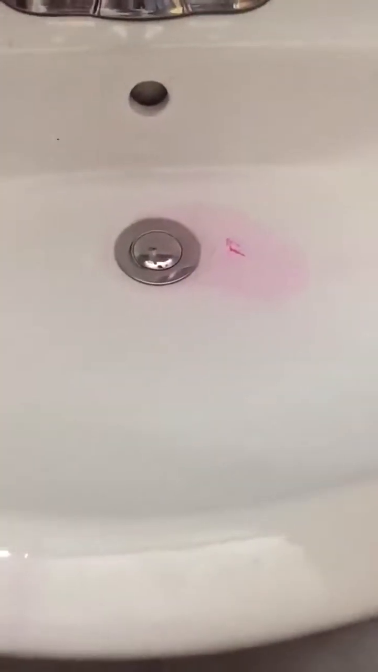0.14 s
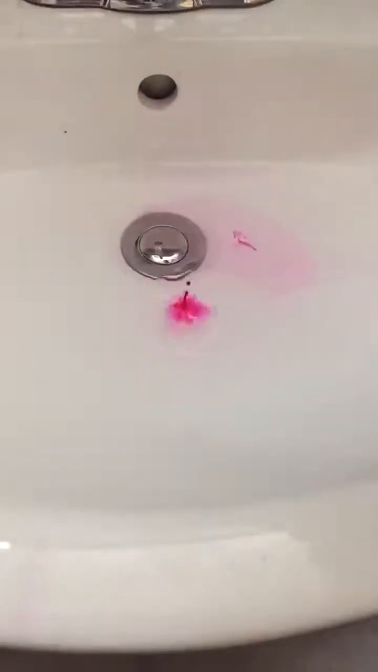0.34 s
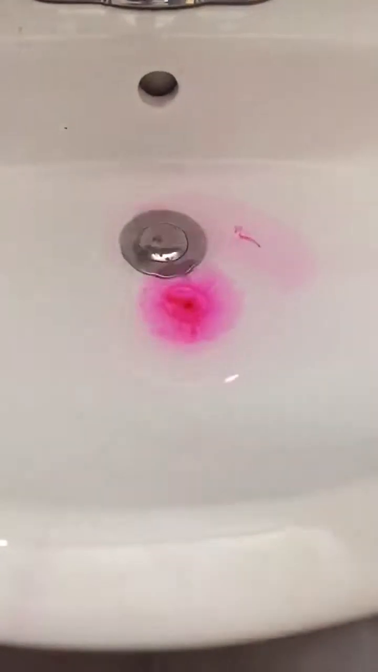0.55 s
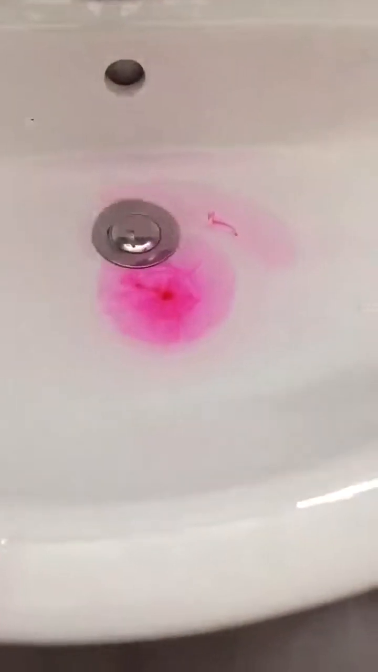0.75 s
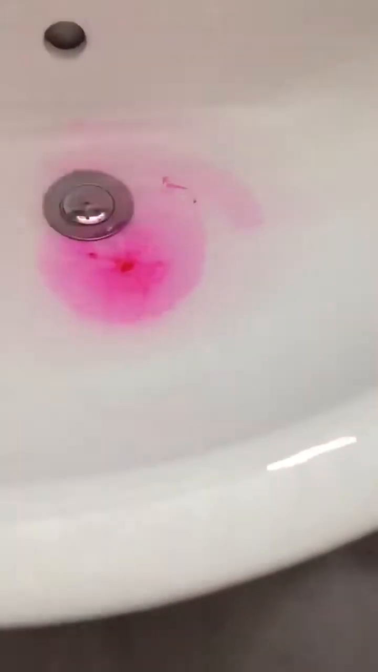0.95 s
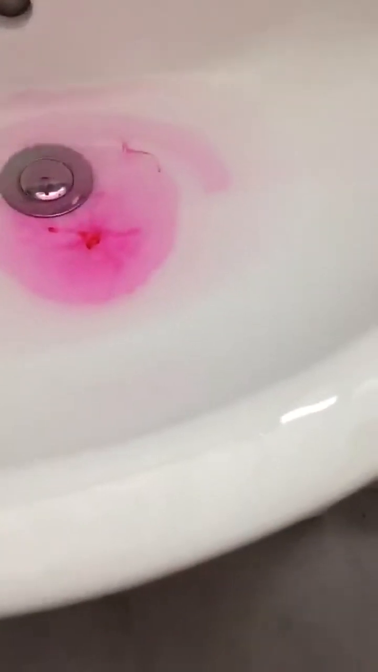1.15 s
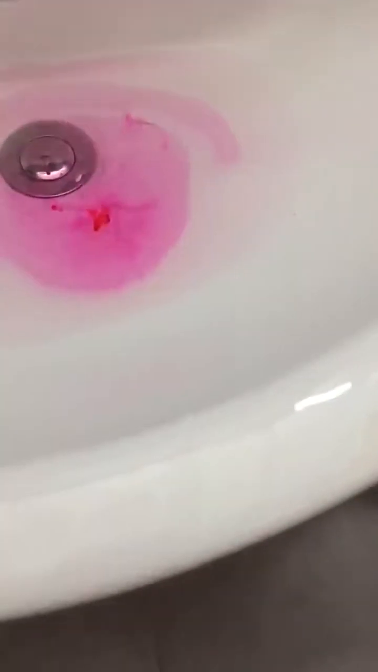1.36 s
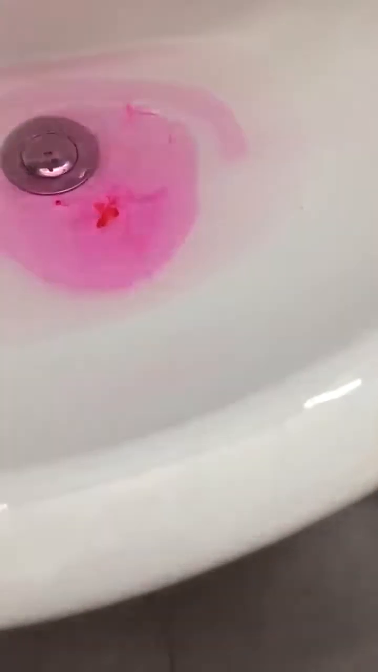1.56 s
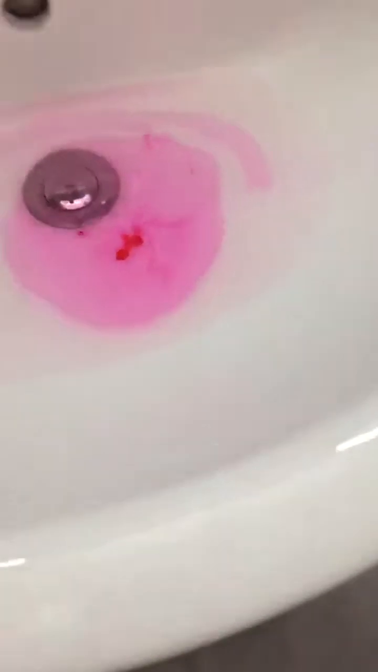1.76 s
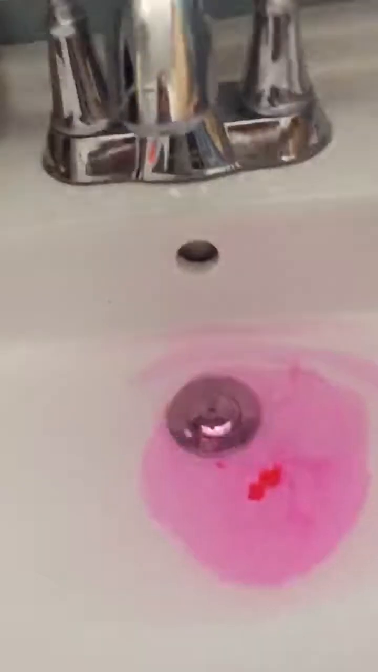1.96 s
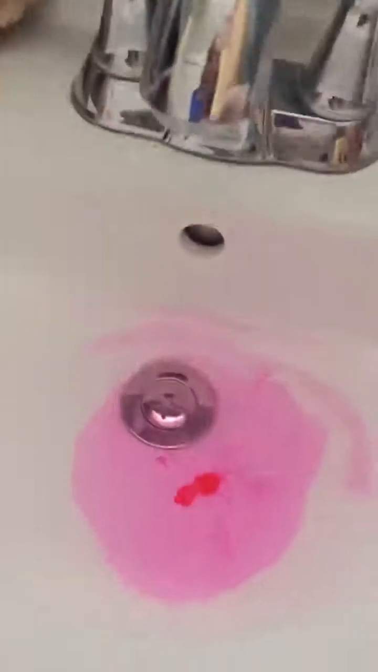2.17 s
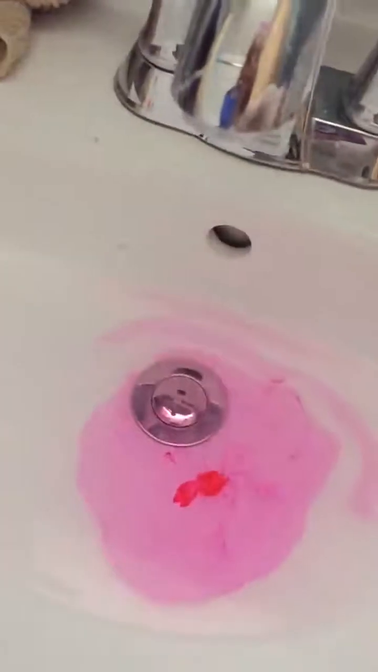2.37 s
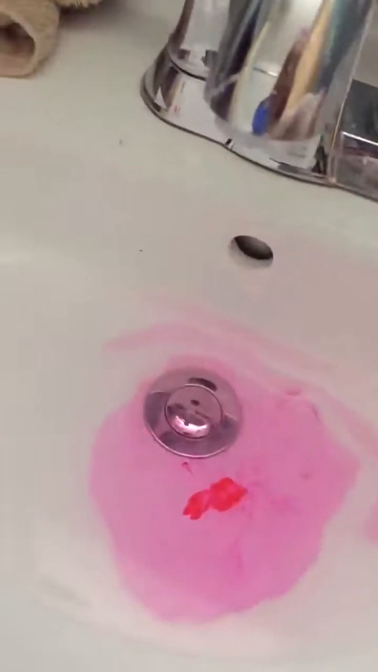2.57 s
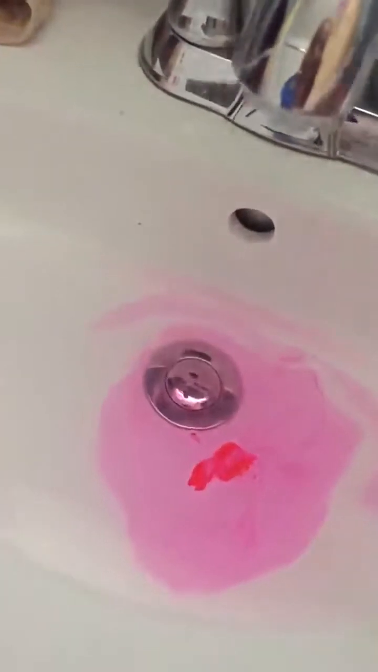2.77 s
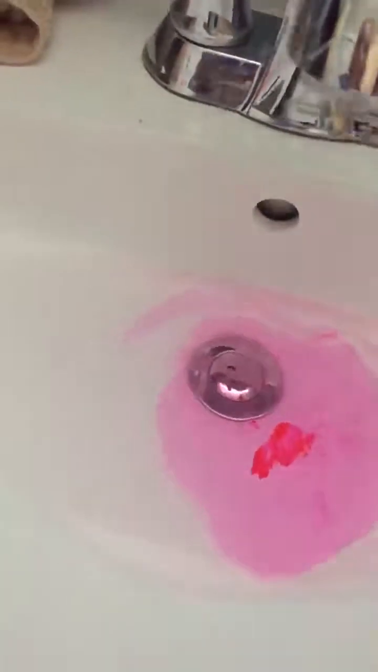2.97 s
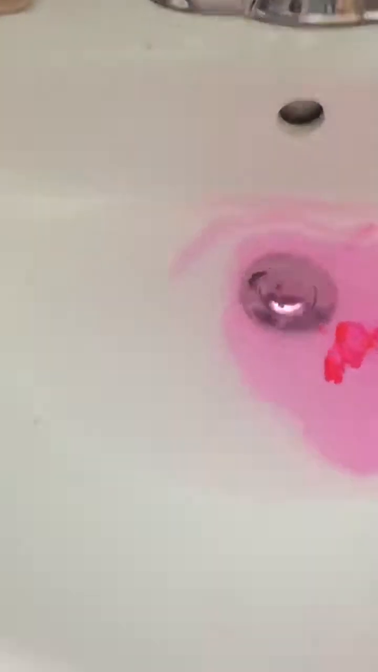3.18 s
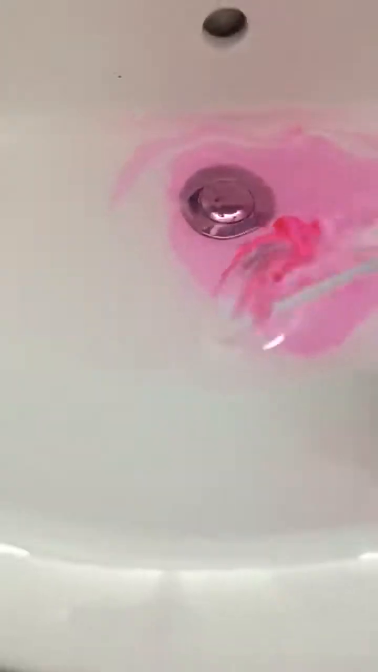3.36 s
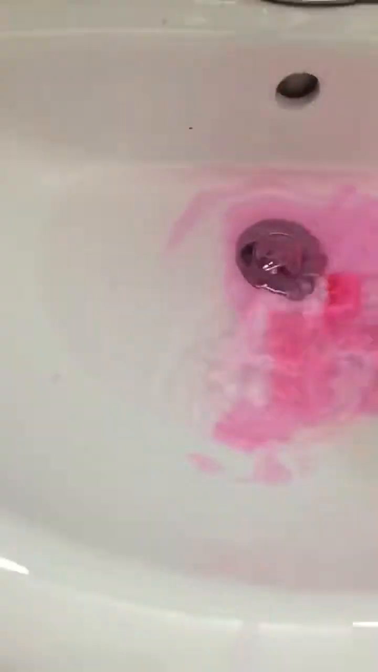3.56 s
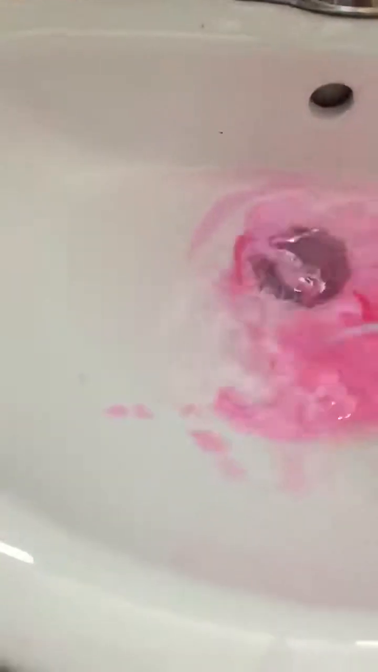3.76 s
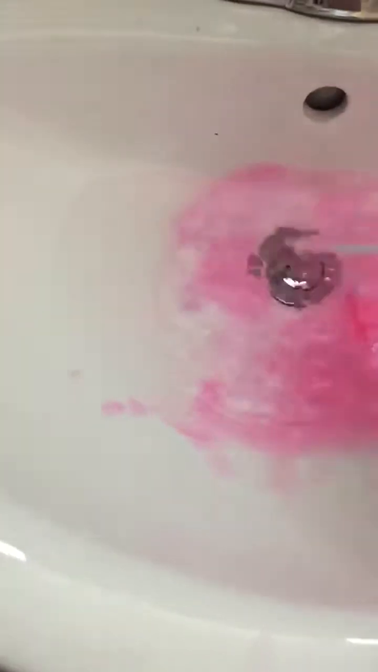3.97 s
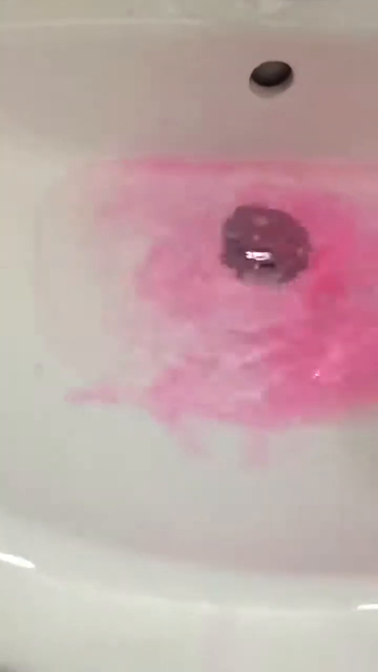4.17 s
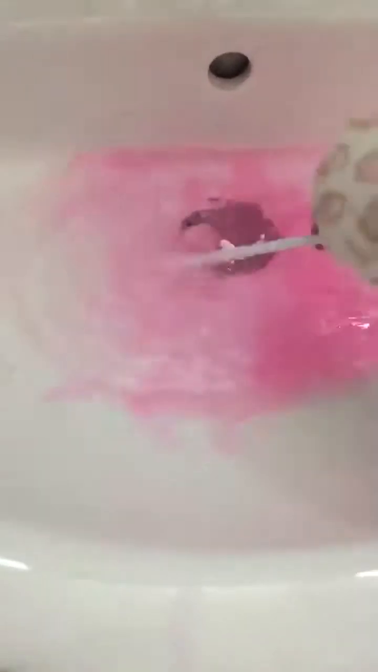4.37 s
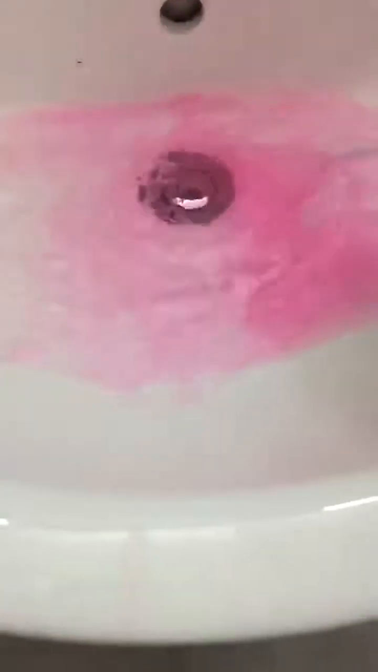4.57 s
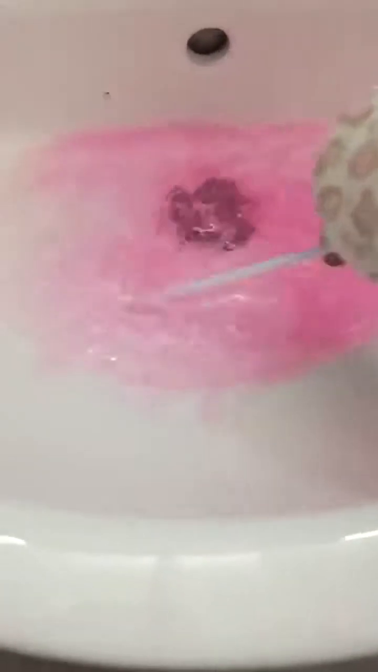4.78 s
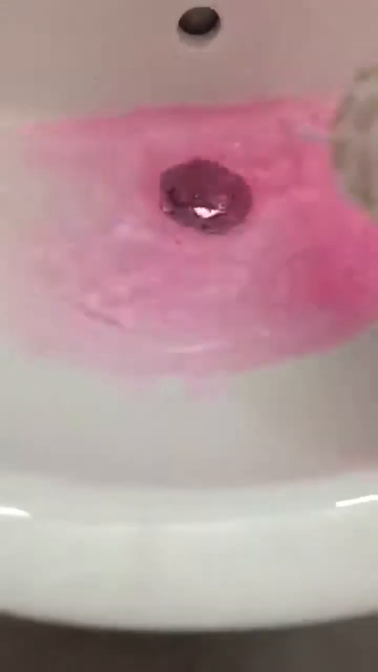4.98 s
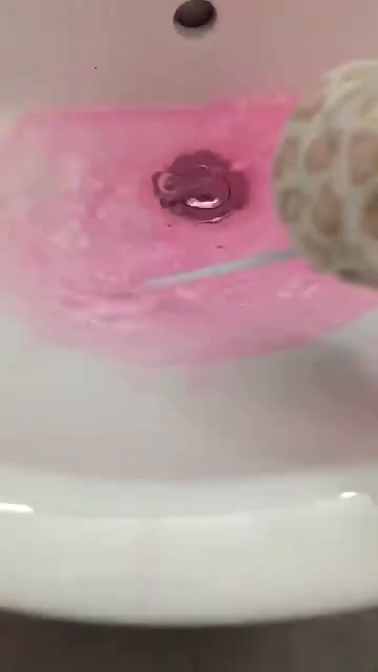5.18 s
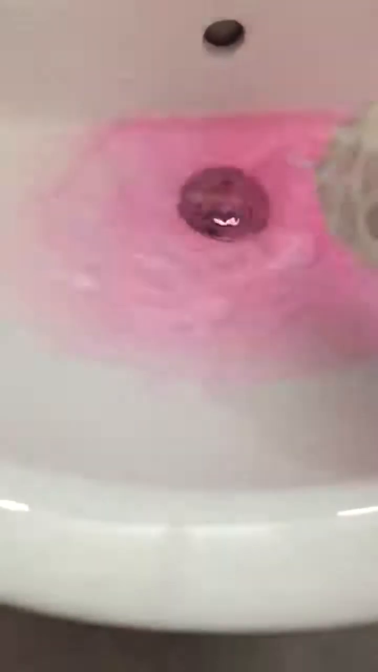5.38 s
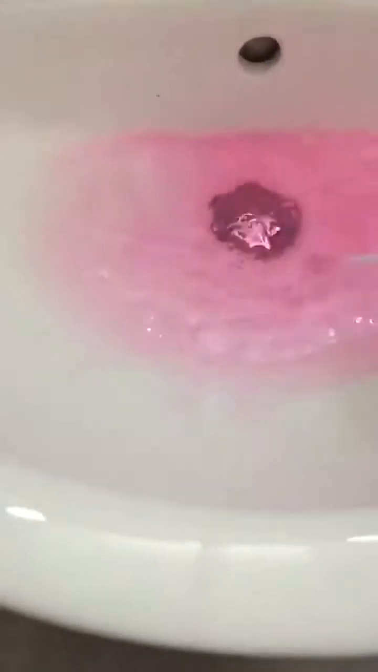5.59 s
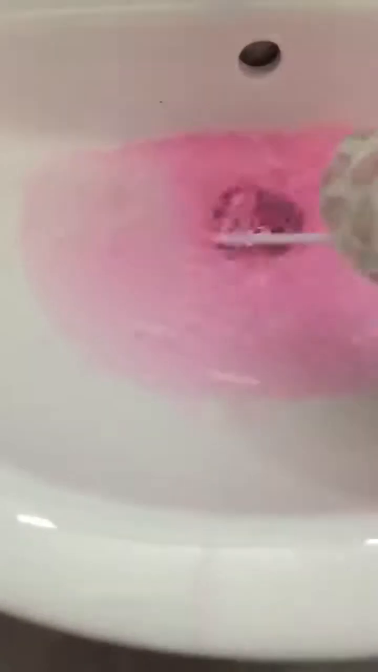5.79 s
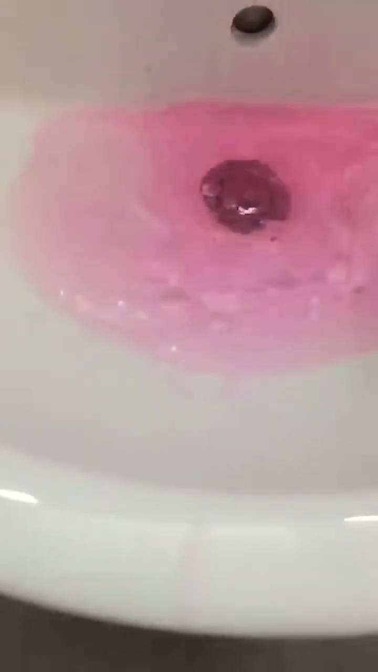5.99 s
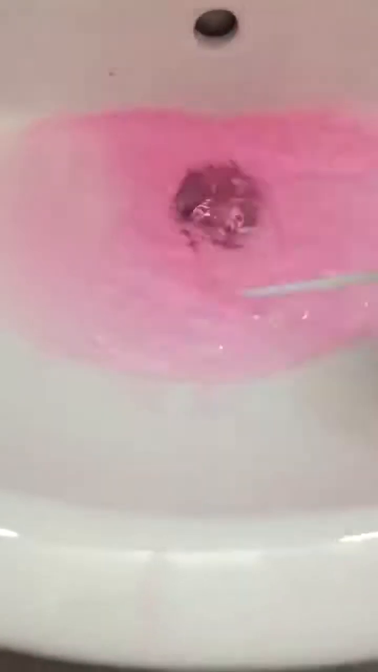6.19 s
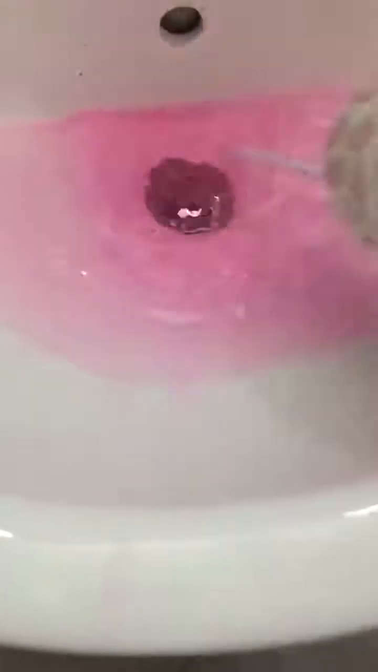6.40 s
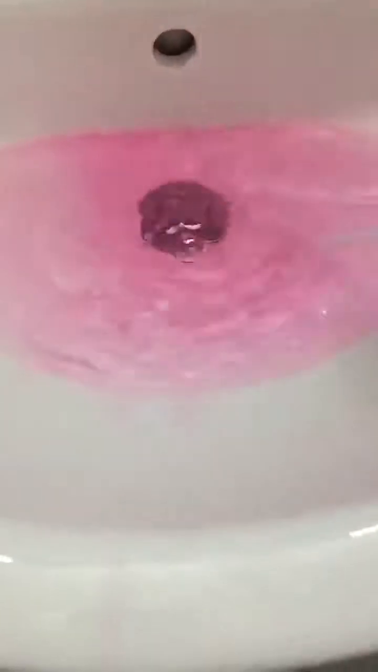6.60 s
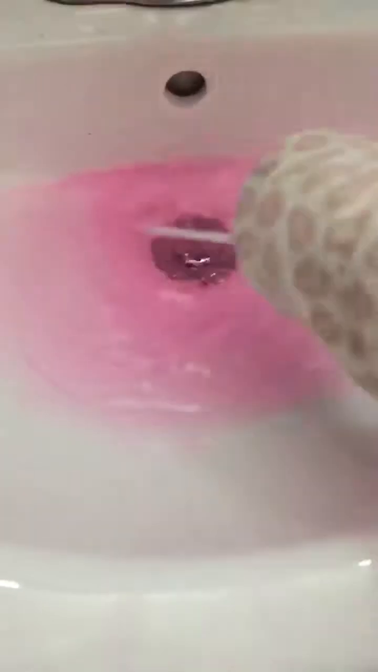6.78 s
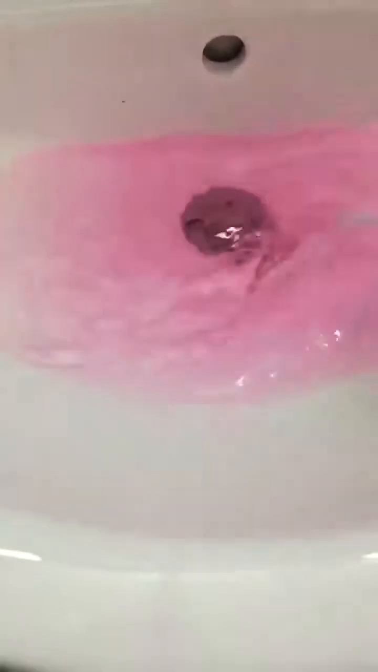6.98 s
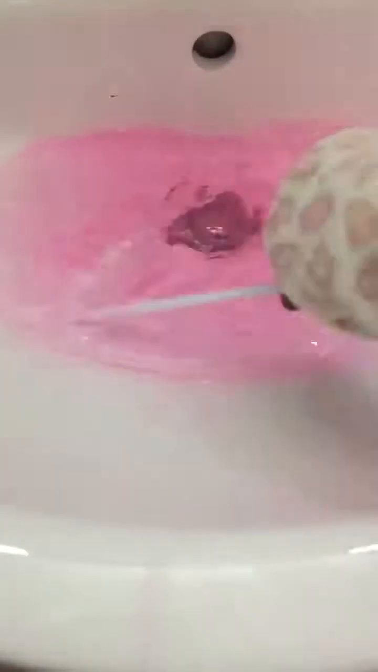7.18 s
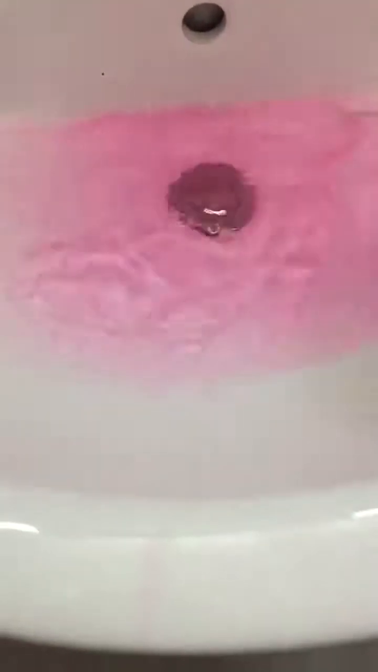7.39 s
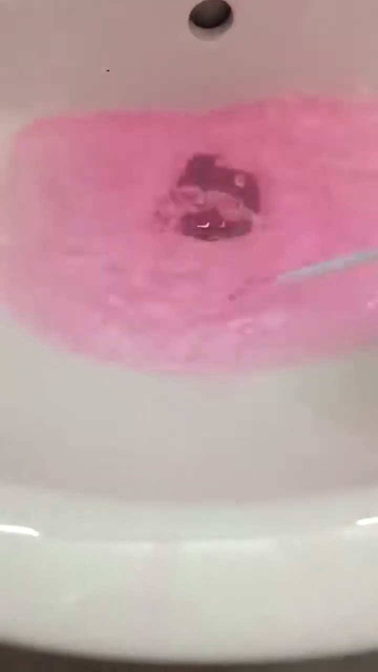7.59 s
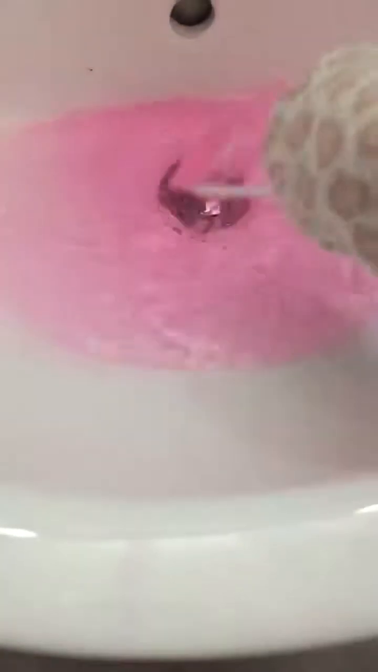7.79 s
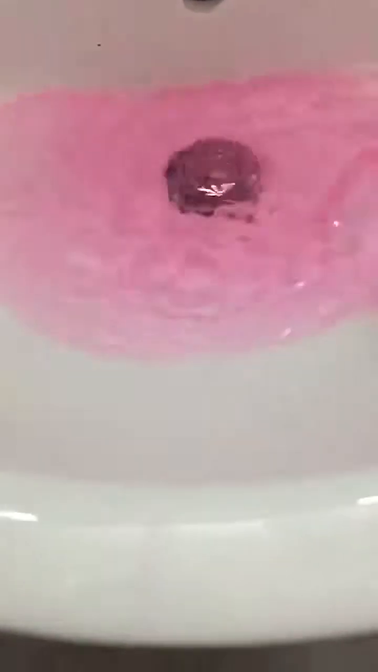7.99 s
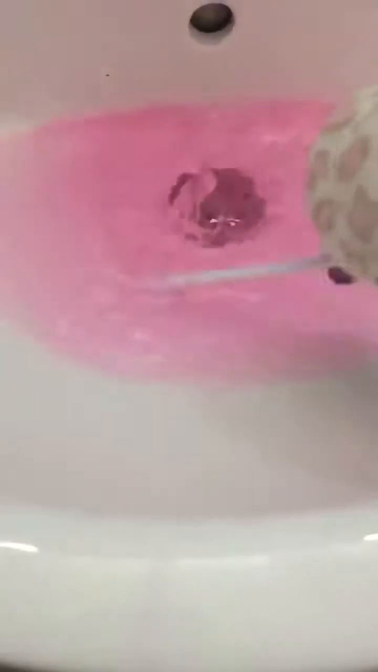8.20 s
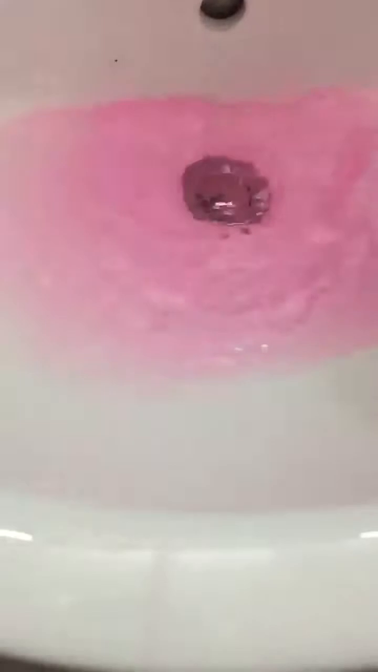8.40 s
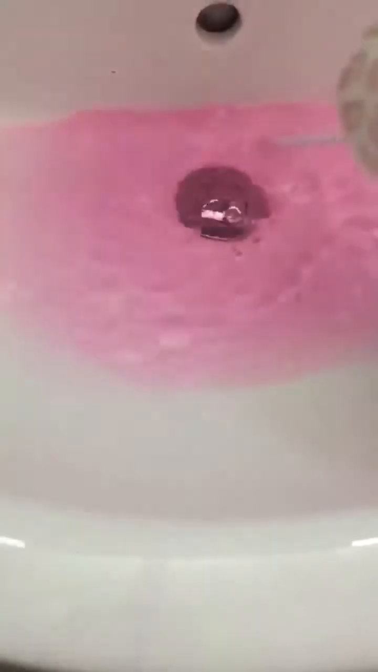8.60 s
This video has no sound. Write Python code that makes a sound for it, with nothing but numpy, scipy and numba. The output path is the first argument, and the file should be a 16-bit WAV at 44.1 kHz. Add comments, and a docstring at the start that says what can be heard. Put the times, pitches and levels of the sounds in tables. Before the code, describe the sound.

A small, quiet bathroom heard close to a ceramic sink. Low room tone and a very faint hum run throughout. At 0.4 s a tiny drip chirps upward, with soft creaks underfoot until about 0.7 s. At 1.4 s something clicks lightly with a hollow knock; faint dull bumps follow around 2.2 s. A small tap at 2.9 s and more creaks lead to 3.3 s, when a thin stick begins stirring shallow water. From 3.7 s the strokes become fuller, quick and irregular, several each second: wet sloshes, gliding bubble pops, glassy plinks, droplet ticks and patchy spray, with brief lulls between. Sharp taps make the basin ring for under a tenth of a second. Strong splashes come near 4.45, 6.2 and 7.6 s, with a loud plop and tap at 8.3 s. At 8.5 s the water stops abruptly; only muffled room tone, a soft creak and a dull bump remain.

```python
"""A small quiet bathroom: room tone with a faint hum; a drop falls (one chirp gliding up), the floor creaks
(noise slips through board modes), something clicks on the rim (noise cracks) and dull knocks follow.
Then a thin stick stirs shallow water in a ceramic sink: bubbles ring as gliding sines, taps ring the
basin's modes, droplets patter in noise and chirps. At the end the water stops and the rest sounds muffled."""
import sys
import numpy as np
from scipy import signal
from scipy.fft import rfft, irfft
from scipy.io import wavfile
from scipy.ndimage import uniform_filter1d
from numba import njit

SR = 44100
rng = np.random.default_rng(int(sys.argv[2]) if len(sys.argv) > 2 else 0)


def voltage_ratio(level):
    """Linear amplitude factor for a level in decibels (scalar or array-like)."""
    return 10 ** (np.asarray(level, float) / 20)


def file_out(sig):
    """Save sig as 16-bit WAV at sys.argv[1]."""
    # one column per channel
    cols = np.atleast_2d(sig).T
    # limit, then scale
    lim = np.clip(cols, -1, 1)
    pcm = np.round(lim * 32767).astype(np.int16)
    wavfile.write(sys.argv[1], SR, pcm)


N = 381465
T = np.arange(N) / SR

# modes of the ceramic basin: pitch_hz, relative_level_db, t60_s
BASIN = [(1360, -0.5, 0.072), (1620, -3.5, 0.055), (2100, 0, 0.047), (2364, -3.5, 0.097), (3300, -9, 0.088),
         (4450, -6, 0.1), (4560, -6.5, 0.064), (3840, -11.5, 0.09), (5100, -17, 0.072), (6460, -11, 0.063),
         (5950, -0.5, 0.027), (7340, -5, 0.034), (8920, 1.5, 0.025)]
STIR_START_S, STIR_END_S, MUFFLED_S = 3.335, 8.5, 8.512
LULL_SLOSH_DB, LULL_SPRAY_DB = -65.5, -61  # the water between strokes


def unit(x):
    """Scale to rms 1."""
    return x / np.sqrt(np.mean(x ** 2))


def coloured(x, points):
    """Shape a signal by (Hz, dB) points."""
    hz, db = np.transpose(points)
    f = np.arange(1, len(x) // 2 + 2) * SR / len(x)
    gain = voltage_ratio(np.interp(np.log(f), np.log(hz), db))
    return irfft(rfft(x) * gain, len(x))


def resonance(x, hz, width_hz):
    """Two-pole band-pass, gain 1 at the centre."""
    return signal.lfilter(*signal.iirpeak(min(hz, .45 * SR), hz / width_hz, SR), x)


def decay(t, t60_s):
    """Exponential envelope that falls 60 dB in t60_s."""
    return np.exp(-np.log(1000) * t / t60_s)


def add(out, start_s, x):
    """Mix x in at start_s."""
    i = int(start_s * SR)
    out[i:i + len(x)] += x[:N - i]


@njit
def chirps(rows, n, rise_s, fall_s):
    """Sines that glide in pitch and level for their length, then die quickly."""
    out = np.zeros(n)
    for start_s, length_ms, db0, db1, hz0, hz1 in rows:
        start, length, phase = int(start_s * SR), length_ms * SR / 1000, 0.
        for i in range(min(int(length + 5 * fall_s * SR), n - start)):
            u = i / length
            hz = min(hz0 * (hz1 / hz0) ** min(u, 1.5), .45 * SR)
            phase += 2 * np.pi * hz / SR
            gain = 10 ** ((db0 + (db1 - db0) * min(u, 1.)) / 20)
            gain *= 1 - np.exp(-i / (rise_s * SR))
            gain *= np.exp(-max(i - length, 0.) / (fall_s * SR))
            out[start + i] += gain * np.sin(phase)
    return out


def air():
    """Room tone as coloured noise, and a faint mains hum."""
    # spectrum of the room tone: freq_hz, relative_level_db_per_hz
    tone_points = [(25, -28), (58, -6), (349, -14), (445, -14), (496, -8), (538, -19.5), (746, -17.5),
                   (1360, -21), (15200, -34.5), (16500, -51.5)]
    tone = voltage_ratio(-67.5) * unit(coloured(rng.standard_normal(N), tone_points))
    hum = voltage_ratio(-75) * np.sin(2 * np.pi * 119.8 * T)
    return tone + hum


def bubbles():
    """Air pockets dragged under by the stick, mostly rising in pitch as each nears the surface; droplet ticks."""
    # the first drop, a tiny bubble that bursts at once:
    # start_s, length_ms, start_db, end_db, start_hz, end_hz (levels before wobble)
    drop_row = (.411, 9, -50, -46, 4200, 13000)
    # bubbles and one droplet tick: start_s, length_ms, start_db (before wobble), start_hz, end_hz
    bubble_rows = [(3.429, 8.1, -21, 1510, 2330), (3.535, 20.6, -40.5, 655, 795),
                   (3.56, 24.5, -46, 815, 1050), (3.687, 23, -51, 724, 970.0),
                   (3.708, 6.4, -26, 717.0, 885.0), (3.711, 11.3, -12, 1037, 1265),
                   (3.728, 7.6, -19.5, 900.0, 1330), (3.846, 16, -42.5, 627, 694),
                   (3.872, 17.4, -26.5, 624, 702), (3.871, 28, -32.5, 1410, 1916),
                   (3.908, 10, -32.5, 1170, 1730), (3.915, 6.7, -16.5, 1830, 2580),
                   (3.972, 6.6, -31, 1250, 1326), (4.0143, 1.5, -19, 6100, 6300),
                   (4.136, 2.9, -13, 1100, 1020), (4.143, 4.5, -18.5, 2480.0, 2700.0),
                   (4.269, 29, -37, 1680, 1970), (4.369, 21, -39.5, 610, 710), (4.4, 10, -19, 1030, 1330.0),
                   (4.4, 22, -25.5, 606, 1150), (4.414, 10, -31, 1290, 1710), (4.431, 18, -23.5, 700, 810),
                   (4.464, 4.1, -15, 910, 930), (4.453, 15, -22.5, 767.0, 620),
                   (4.476, 18.6, -19.5, 548, 524), (4.504, 17, -23.5, 745, 634),
                   (4.503, 5, -22, 1050, 1295), (4.582, 29, -46, 847, 2290), (4.733, 25, -43.5, 685, 1100),
                   (4.76, 4.4, -20, 836, 884), (4.761, 3.5, -10.5, 1140, 1165),
                   (4.787, 5.7, -22.5, 890.0, 875), (4.818, 2.3, -19.5, 2060, 2120),
                   (4.819, 11, -25.5, 1580, 1654), (4.926, 4.6, -26, 2200, 2300),
                   (4.969, 6.9, -32.5, 690, 717), (5.094, 7.1, -19, 1120, 1097),
                   (5.199, 11.6, -39.5, 850, 1050), (5.24, 48, -48, 496, 610), (5.31, 18, -32, 915, 1053),
                   (5.316, 3.2, -34.5, 3720, 4280), (5.359, 2.6, -40, 4500, 4530),
                   (5.468, 29, -35.5, 943, 1296), (5.537, 2.9, -16.5, 1320, 1280),
                   (5.557, 3.1, -16.5, 1390, 1445), (5.709, 2.2, -24.5, 694, 696.0),
                   (5.795, 22.5, -44, 668.0, 880.0), (5.816, 17.5, -17.5, 1042, 1574),
                   (5.857, 11, -24.5, 704, 970), (5.886, 2.8, -10.5, 1250, 1260),
                   (5.925, 9, -19.5, 725, 1110), (5.93, 8.5, -25, 1195, 1280),
                   (6.029, 18.3, -29.5, 1080, 1905), (6.029, 9.3, -24, 630, 708),
                   (6.192, 12, -22, 1845, 1935.0), (6.203, 3.5, -13, 1040, 1277),
                   (6.25, 18, -38.5, 644, 642), (6.347, 13, -33.5, 1510, 1537),
                   (6.356, 6.8, -21.5, 2500, 3250), (6.387, 8.4, -38.5, 1900, 1720),
                   (6.416, 12.6, -40.5, 560, 725.0), (6.466, 13.7, -30.5, 705, 905),
                   (6.562, 2.1, -8, 1060, 1115), (6.639, 34.3, -33, 507, 716), (6.65, 22, -36, 943, 950),
                   (6.677, 16, -31.5, 887, 1030), (6.803, 32, -28, 620, 1130), (6.891, 22.5, -33, 602, 890),
                   (6.93, 33, -41, 1137, 1076), (7.044, 12, -21.5, 647, 658),
                   (7.062, 10.7, -26.5, 1030, 1036), (7.076, 18.6, -32.5, 1286, 1860),
                   (7.197, 13.4, -39, 900, 1060), (7.212, 5.5, -27, 1070, 1200),
                   (7.229, 1.8, -7.5, 1590, 1620), (7.244, 6.0, -15, 1255, 1204),
                   (7.262, 9.9, -29, 1180, 1320), (7.407, 4, -23, 2700, 2860),
                   (7.428, 9.7, -21.5, 1554, 1770), (7.535, 9, -30.5, 670, 710),
                   (7.551, 4.2, -25.5, 1040, 1205), (7.614, 2.6, -12.5, 1620.0, 1746),
                   (7.637, 3.6, -26.5, 2280.0, 2290), (7.705, 34, -28.5, 801, 1890),
                   (7.848, 16, -19.5, 822, 970), (7.884, 2.9, -17.5, 1220.0, 1257),
                   (7.952, 2.3, -12, 1700, 1770), (8.194, 8.5, -25.5, 1000, 1060),
                   (8.256, 7, -24, 734, 700.0), (8.3, 2, 3, 1850, 1990.0), (8.303, 2.5, -9.5, 1000, 964),
                   (8.34, 5.7, -24.5, 1360.0, 1620.0), (8.409, 7.5, -23, 1980.0, 2015)]
    start_s, length_ms, db, hz0, hz1 = np.transpose(bubble_rows)
    steady_db, fade_share = -43, 0.39  # end level moves this share of the way to steady_db
    end_db = db - fade_share * (db - steady_db)
    rows = np.transpose([start_s, length_ms, db, end_db, hz0, hz1])
    wobble = unit(resonance(rng.standard_normal(N), 70., 110.0))  # ripples pass over the bubble
    return voltage_ratio(1.3 * wobble) * chirps(np.vstack([rows, drop_row]), N, .0009, .0035)


def waver():
    """Slow chance, about ten turns a second, spread 1."""
    return unit(resonance(resonance(rng.standard_normal(N), 9.8, 10), 9.5, 22))


def floor():
    """Rough slips excite the boards; a few knocks and bumps are decaying bands of noise."""
    # soft creaks underfoot: centre_s, peak_level_db, length_s (between 1/e points)
    creak_rows = [(0.447, -57.5, 0.14), (0.644, -59, 0.12), (2.982, -61.5, 0.059), (3.096, -53, .12),
                  (3.261, -58, 0.12), (8.598, -57.5, 0.069)]
    # board modes: pitch_hz, width_hz, relative_level_db (mean)
    board_modes = [(267, 39, -2.5), (461, 46, -5.5), (552, 46, -1), (611, 43, -10), (1090, 67, -13),
                   (1440, 140, -14)]
    # knocks and dull bumps: start_s, level_db (rms before decay), pitch_hz, t60_s
    bump_rows = [(1.405, -50, 1620, 0.21), (1.406, -49.5, 646, 0.26), (2.128, -60, 1440, 0.15),
                 (2.19, -54, 151, .2), (4.47, -49.5, 147, 0.28), (2.23, -55.5, 116, 0.24),
                 (8.607, -52, 103, 0.1)]
    slips = rng.standard_normal(N) * (rng.random(N) < 1500 / SR)  # 1500 slips a second
    boards = np.zeros(N)
    for hz, width_hz, db in board_modes:
        mode = unit(resonance(resonance(slips, hz, width_hz), hz, 2 * width_hz))
        boards += voltage_ratio(db + 2.5 * waver()) * mode
    drift = np.cumsum(.025 * waver())  # the load shifts, the pitch drifts
    boards = np.interp(np.arange(N) + drift, np.arange(N), unit(boards))
    out = boards * sum(voltage_ratio(db) * np.exp(-(2 * (T - s) / length_s) ** 2) for s, db, length_s in creak_rows)
    t = T[:int(.3 * SR)]
    for start_s, db, hz, t60_s in bump_rows:
        thud = resonance(resonance(rng.standard_normal(len(t)), hz, 0.5 * hz), hz, 2 * hz)
        add(out, start_s, voltage_ratio(db) * decay(t, t60_s) * unit(thud))
    return out


def taps():
    """A crack under a millisecond with a wet spatter, and the basin ringing differently each time."""
    # taps and splats: start_s, crack_db (before scaling and colour), crack_centre_hz,
    # ring_db (re crack, before scaling)
    tap_rows = [(1.4036, -26.5, 1860, -25.5), (1.438, -37, 2070, -26), (2.868, -31.5, 4450, -6.5),
                (3.259, -44.5, 3900, -6.5), (3.3369, -22, 4500, -7), (3.4246, -34.5, 7000, -15),
                (3.4316, -17, 2166, -29), (3.5386, -29, 6650, -24), (3.557, -32.5, 3600, -38),
                (3.77, -10, 9400, -5), (3.903, -12, 1954, -28), (3.9534, -29, 7160, -9.5),
                (4.0785, -42, 2170, -2), (4.1094, -7.5, 2320, -18.5), (4.1665, -21.5, 1900, -11.5),
                (4.475, -12.5, 2400, -19), (4.503, -19.5, 4660, -9.5), (4.7045, -27, 8700, -30),
                (4.801, -25, 2090, -7.5), (4.818, -14.5, 4900, -8.5), (4.8575, -5.5, 2520, -31),
                (4.876, -19, 7800, -28), (4.9405, -16, 2040, -24), (5.107, -21.5, 3000, -17),
                (5.27, -27, 3850, -41), (5.432, -25.5, 4670, -31.5), (5.465, -26.5, 2260, -11),
                (5.4908, -29, 2060, -2.5), (5.505, -19.5, 2500, -21), (5.5355, -26.5, 5800, 0),
                (5.557, -13.5, 7050, -10), (5.6129, -17, 2560, -27), (5.83, -25, 3680, -29.5),
                (5.8851, -16.5, 4200, -22.5), (6.2003, -22, 1870, -3.5), (6.2297, -15, 5770, -9.5),
                (6.356, -27.5, 1640, -15), (6.445, -30, 2440, -36.5), (6.525, -21.5, 1360, -23.5),
                (6.538, -14.5, 980, -27), (6.561, -17.5, 5800, -9.5), (6.5862, -16, 2630, -32.5),
                (6.773, -36, 6570, -10), (6.8017, -34, 2070, -1.5), (7.0412, -20.5, 5460, -15),
                (7.229, -14, 1780, -24), (7.2448, -18, 2280, -12), (7.255, -26, 6500, -24),
                (7.272, -28, 3300, -9), (7.348, -28, 4000, -26), (7.3738, -24, 3150, -15),
                (7.4128, -11, 4040, -29), (7.4282, -30, 5450, -20), (7.594, -11.5, 5370, -10.5),
                (7.732, -20.5, 1890, -20.5), (7.9093, -15.5, 10600, -10), (7.926, -13, 4840, -7.5),
                (8.0071, -21, 2570, -33), (8.2775, -9.5, 2100, -14), (8.278, -14, 7000, -22),
                (8.4085, -18, 3620, -20.5)]
    out, t = np.zeros(N), T[:int(.18 * SR)]
    chance = rng.standard_normal((len(tap_rows), 2 * len(BASIN)))
    for (start_s, crack_db, hz, ring_db), draw in zip(tap_rows, chance):
        # hard contact rings the basin and cracks broadly; a droplet only ticks
        hard = np.clip((ring_db + 29.5) / 10.0, .03, 1)
        snap = np.exp(-t / .0006)
        spatter = voltage_ratio(-6.5) * np.exp(-t / 0.0033) + voltage_ratio(-27.0) * np.exp(-t / 0.019)
        burst = rng.standard_normal(len(t)) * (snap + spatter)
        tick = resonance(resonance(burst, hz, 0.31 * hz), hz, hz)
        tick = 0.088 * np.sqrt(hz) * tick / np.linalg.norm(tick)
        # a contact with a lower centre has less top
        broad = signal.lfilter(*signal.butter(1, min(4.5 * hz, .4 * SR), fs=SR), burst)
        # the air pocket under a droplet rings some cycles
        plop = np.exp(-t * hz / 9) * np.sin(2 * np.pi * hz * t)
        crack = 1.45 * hard * broad + tick + 1.25 * (1 - hard) * plop
        scatter_db, detune = 3 * draw[::2], 1 + .016 * draw[1::2]
        ring = np.zeros(len(t))
        for (f, db, t60_s), a, b in zip(BASIN, scatter_db, detune):
            # modes near the colour of the contact ring most
            mode_db = db + a - 6.1 * abs(np.log2(f / hz))
            ring += voltage_ratio(mode_db) * decay(t, t60_s) * np.sin(2 * np.pi * f * b * t)
        add(out, start_s, voltage_ratio(crack_db) * (0.42 * crack + voltage_ratio(ring_db - 5.0) * ring))
    return coloured(out, [(300, -16.0), (900, -1.5), (2000, 4.5), (10500, 1.5), (15800, -1.0), (17000, -41.0)])


def churn(column, linger, lull_db):
    """Stirred water in dB: each stroke rises fast, then settles or (settle_s 0) stops at once, over a lull."""
    # strokes of the stick: start_s, slosh_db, spray_db,
    # settle_s (per 20 dB, before the factor linger; 0 = stops at once)
    strokes = [(3.338, -50, -39, 0.05), (3.428, -42.5, -44.5, 0.04), (3.539, -42.5, -50.5, 0.08),
               (3.715, -30.5, -42.5, 0.19), (3.88, -42, -45, 0.19), (3.91, -36.5, -49, 0.1),
               (4.083, -41.5, -43.5, 0.08), (4.125, -35, -35.5, 0.1), (4.27, -62, -53.5, 1.8),
               (4.41, -39, -48, .1), (4.454, -26, -35.5, 0.12), (4.6, -54.5, -47, 0.36),
               (4.767, -34, -44.5, 0.19), (4.86, -33, -40, 0.2), (5.096, -39, -45, 0.23),
               (5.312, -38.5, -44.5, 0.1), (5.46, -51, -47.5, 0.1), (5.55, -36.5, -45.5, 0.25),
               (5.821, -40.5, -50.5, 0.24), (5.878, -38.5, -46, 0.36), (6.197, -27, -38, 0.1057),
               (6.35, -51, -49.5, 0.07), (6.45, -46.5, -58, 0.1), (6.561, -33.5, -44, 0.26),
               (6.807, -36.5, -54, 0.06), (6.902, -41, -43.5, 0.17), (6.94, -40, -41.5, 0.1),
               (7.042, -34.5, -41, 0.15), (7.21, -45, -46.5, 0.13), (7.244, -34, -38.5, 0.14),
               (7.38, -42, -43.5, 0.15), (7.415, -54, -47, 0.18), (7.54, -48.5, -48, 0.13),
               (7.598, -30.5, -39, 0.16), (7.72, -41.5, -44.5, 0.22), (7.855, -36.5, -48, 0),
               (7.908, -34.0, -37, 0.26), (8.17, -51, -46, 0.1), (8.26, -34.5, -34.5, 0.1),
               (8.3, -36, -46, 0.12), (8.409, -40, -42, 0)]
    rise_db_per_s = 1299
    t = T[::32]
    # the lull comes up in the 0.1 s before the fourth stroke
    power = voltage_ratio(2 * lull_db) * np.clip((t - strokes[3][0]) / .1 + 1, 1e-4, 1)
    for row in strokes:
        late = t - row[0]
        slope_db = np.where(late < 0, rise_db_per_s * late, -20 * late / (linger * row[3]))
        power = power + voltage_ratio(2 * (row[column] + slope_db))
    level_db = np.interp(T, t, 10 * np.log10(power))
    return np.where((T > STIR_START_S) & (T < STIR_END_S), level_db, -130)


def swarm(level_db, low_hz, octaves, cycles, scatter_db, glide, fall_s, count):
    """Many small random bubbles whose level follows the churning of the water."""
    when, pitch, life, size, rise = rng.random((count, 5)).T
    start_s = STIR_START_S + when * (STIR_END_S - STIR_START_S)
    hz = low_hz * 2 ** (octaves * pitch)
    db = level_db[(start_s * SR).astype(int)] - scatter_db * np.log(1 - .96 * size)
    length_ms = 1000 * cycles * (0.45 + life) / hz
    rows = np.transpose([start_s, length_ms, db, db - 10.0, hz, hz * (1 + glide * rise)])
    return chirps(rows, N, fall_s / 4, fall_s)


def patchy(rate_hz, spread_db):
    """Spray noise in half-octave bands, each flickering on its own."""
    # spectrum of the spray: freq_hz, relative_level_db_per_hz
    spray_points = [(590, -50.5), (1000, 12), (4700, 7), (5170, 2), (9400, -1.5), (14200, -1.5),
                    (16500, -28)]
    spray = unit(coloured(rng.standard_normal(N), spray_points))
    k = int(SR / rate_hz)
    walks = np.repeat(rng.standard_normal((8, N // k + 1)), k, axis=1)
    walks = uniform_filter1d(walks, k, axis=1)[:, :N]
    out = np.zeros(N)
    for band, walk in enumerate(walks):
        ratio = 2 ** (band / 2)
        out += voltage_ratio(spread_db * walk) * resonance(spray, 1300. * ratio, 450. * ratio)
    return unit(out)


def slosh(big):
    """Gurgle, plinks, droplet ticks and a wash of churned water, all setting the basin humming."""
    low_db = churn(column=1, linger=0.92, lull_db=LULL_SLOSH_DB)
    high_db = churn(column=2, linger=1.26, lull_db=LULL_SPRAY_DB)  # spray settles more slowly
    gurgle = swarm(low_db - 8.5, low_hz=520, octaves=1.8, cycles=12.06, scatter_db=4.9,
                   glide=0.45, fall_s=0.0007, count=900)
    plinks = swarm((low_db + high_db) / 2 - 4, low_hz=1600., octaves=1.8, cycles=16, scatter_db=4.55,
                   glide=0.098, fall_s=0.0018, count=1900)
    ticks = swarm(high_db, low_hz=6500., octaves=1.25, cycles=4., scatter_db=6.,
                  glide=.1, fall_s=.0004, count=800)
    wash = patchy(rate_hz=30, spread_db=7.5) * voltage_ratio(high_db - 8)
    # ripples hiss on against the glaze
    lapping = unit(resonance(wash, 2250., 600.) / voltage_ratio(high_db)) * voltage_ratio(low_db - 11)
    # a blur of big overlapping bubbles
    blur = gurgle / voltage_ratio(low_db) + rng.standard_normal(N)
    glug = unit(resonance(blur, 750., 500.)) * voltage_ratio(low_db - 9)
    water = glug + gurgle + plinks + voltage_ratio(4.0) * ticks + wash + lapping
    drive = water + 0.42 * big
    humming = sum(voltage_ratio(db) * resonance(drive, hz, 13.1 / t60_s) for hz, db, t60_s in BASIN)
    return water + voltage_ratio(-3.5) * humming


def waves():
    """Waves thump softly against the bowl: low noise that follows the slosh."""
    thump = unit(resonance(resonance(rng.standard_normal(N), 230.0, 200.), 200., 400.))
    return thump * voltage_ratio(churn(column=1, linger=0.94, lull_db=LULL_SLOSH_DB) - 29.0)


def room(x):
    """Bowl and tiled walls: a dense tail after a few milliseconds, treble dying first."""
    t = T[:int(.5 * SR)]
    low, high = (rng.standard_normal(len(t)) * decay(t, t60_s) for t60_s in (0.2, 0.11))
    tail = resonance(low, 1300.0, 2400.0) + resonance(high, 5600.0, 6000.0)
    tail = tail * (1 - np.exp(-t / 0.0063))
    return x + voltage_ratio(-15.5) * signal.fftconvolve(x, tail / np.linalg.norm(tail))[:N]


def scene():
    """Water and basin in the room, over the floor and the air; the water stops at MUFFLED_S."""
    big = bubbles()
    water = room(big + taps() + slosh(big)) * np.clip((MUFFLED_S - T) / 0.0032, 0, 1)
    # small sources radiate no bass
    small = signal.sosfilt(signal.butter(3, 400, "high", fs=SR, output="sos"), water)
    return (small + waves() + floor() + air())[None]


def band_limit(x):
    """A steep low-pass at the top of the band."""
    return signal.sosfilt(signal.butter(12, 17160, fs=SR, output="sos"), x)


def record(dry):
    """The treble vanishes for the last moment, by a steep low-pass raised 4 dB."""
    low_pass = signal.ellip(8, .2, 50, 2250, fs=SR, output="sos")
    dull = voltage_ratio(4.0) * signal.sosfiltfilt(low_pass, dry)
    late = np.clip((T - MUFFLED_S) / .004, 0, 1)
    return band_limit(dry + late * (dull - dry))


dry = scene()
out = record(dry)
file_out(out)
```